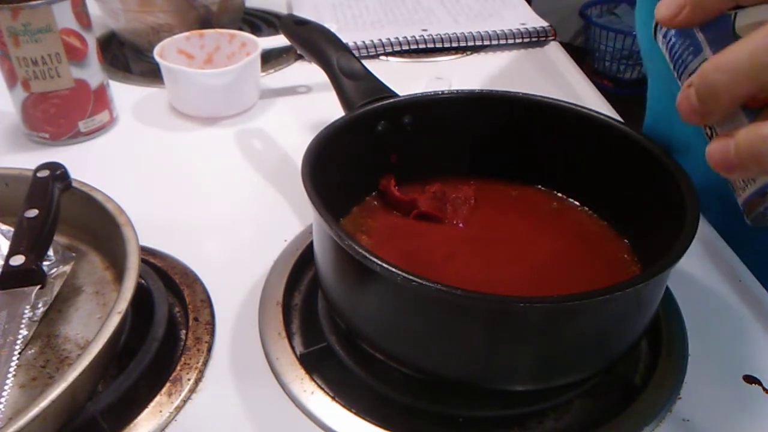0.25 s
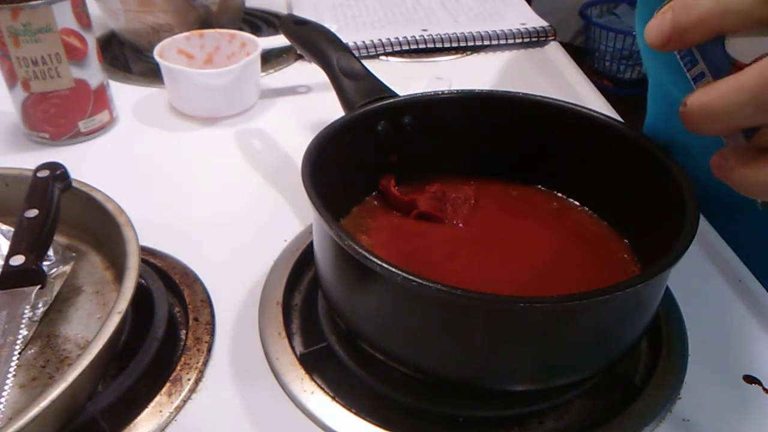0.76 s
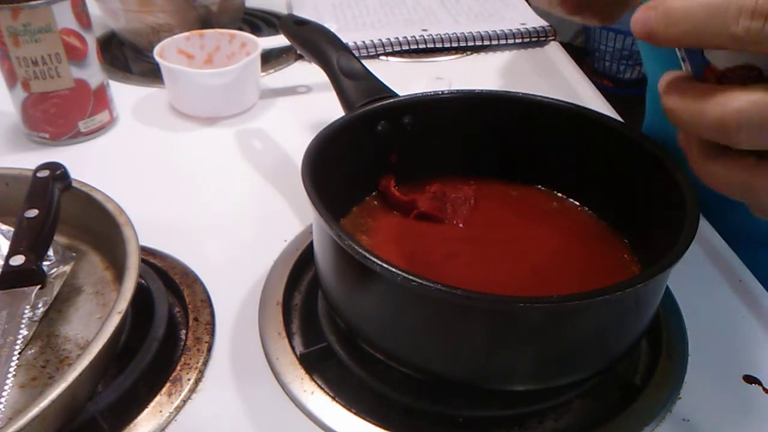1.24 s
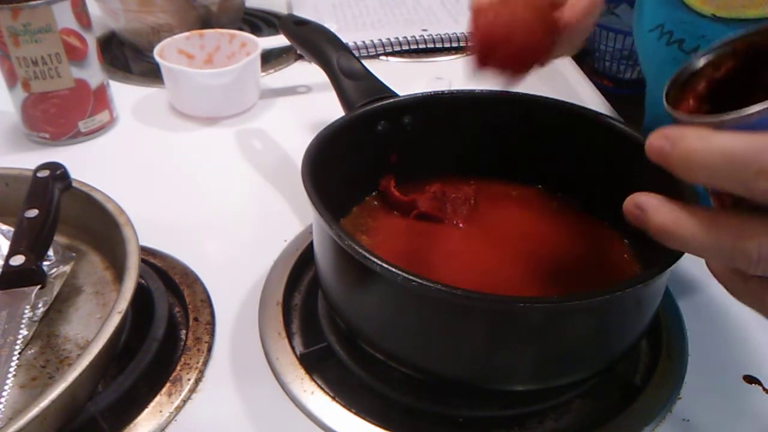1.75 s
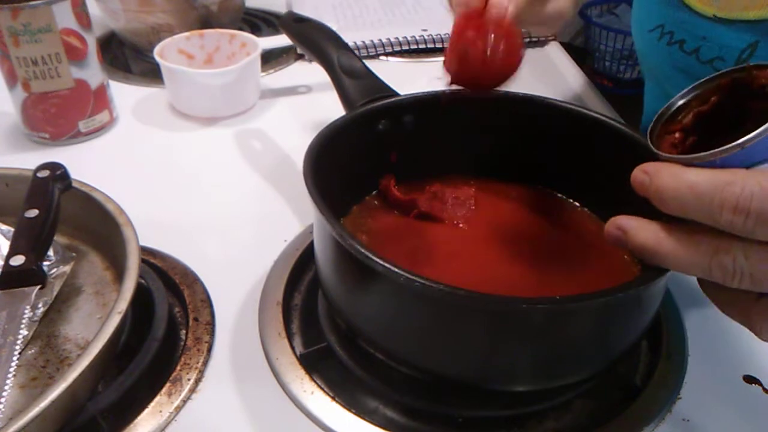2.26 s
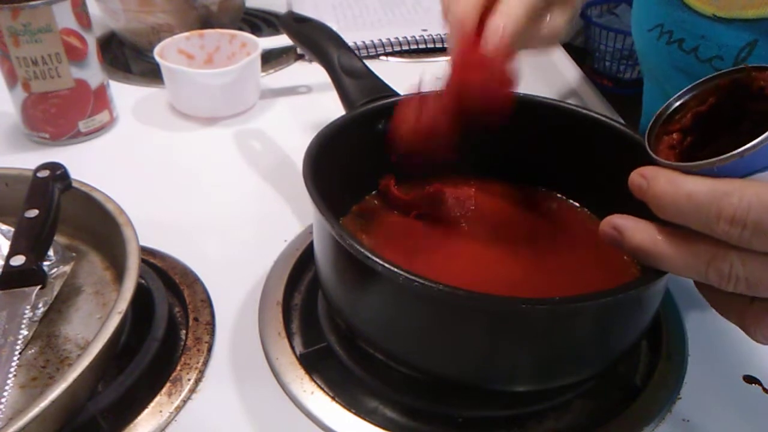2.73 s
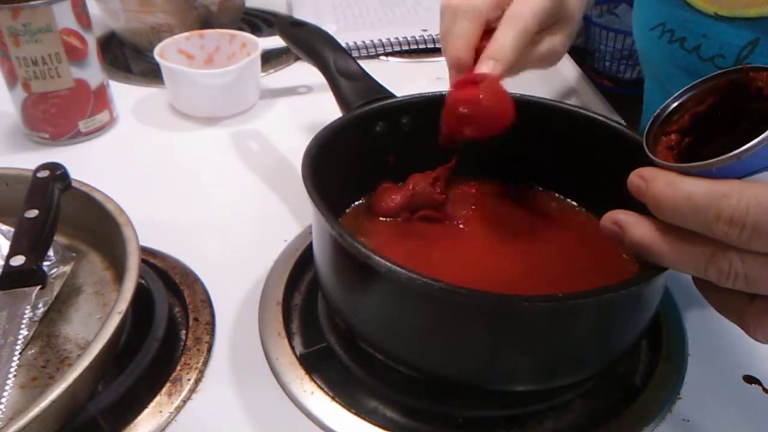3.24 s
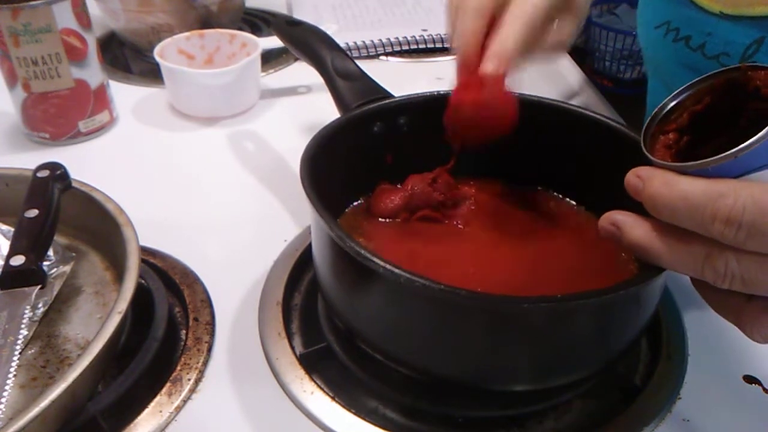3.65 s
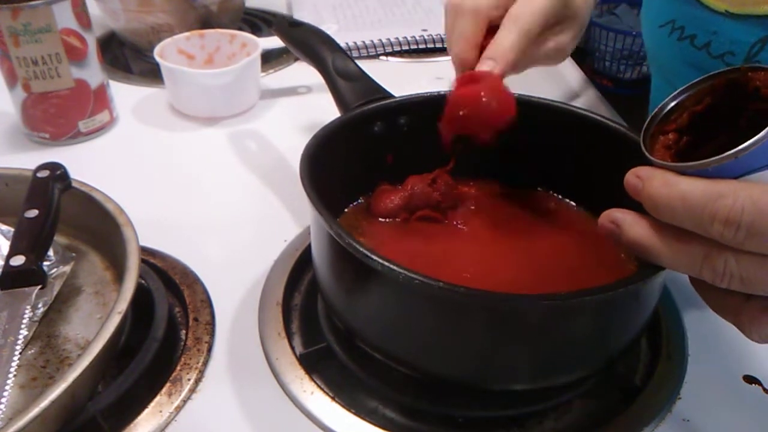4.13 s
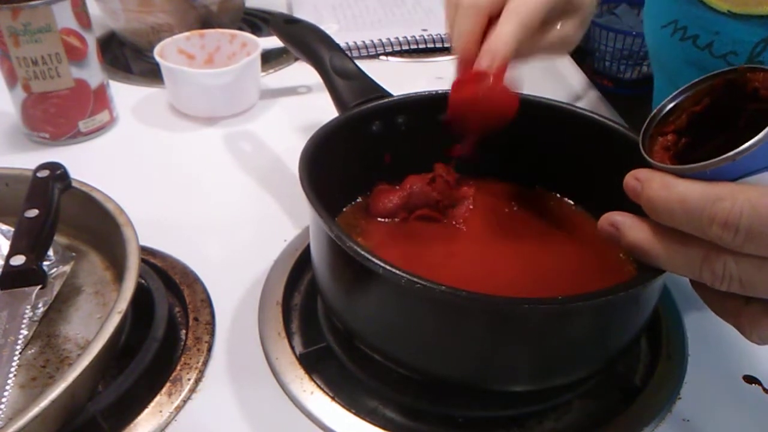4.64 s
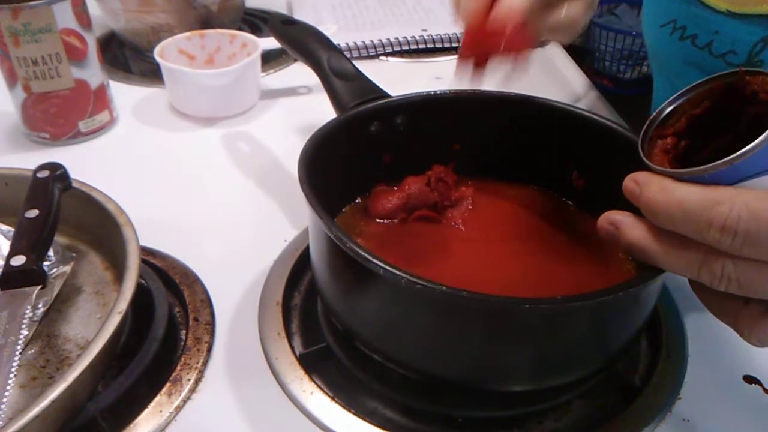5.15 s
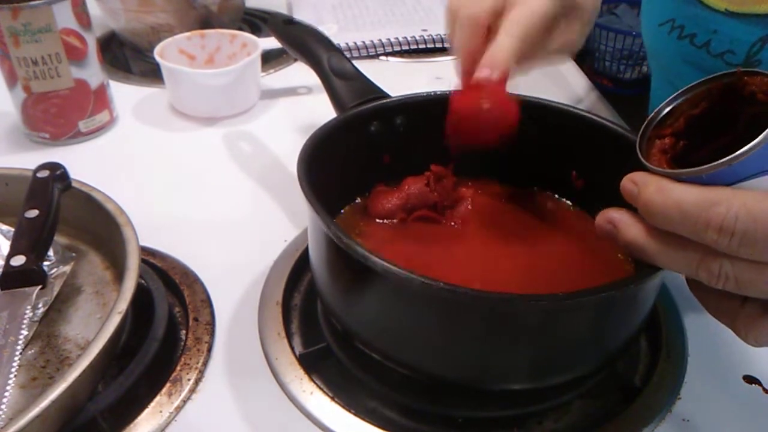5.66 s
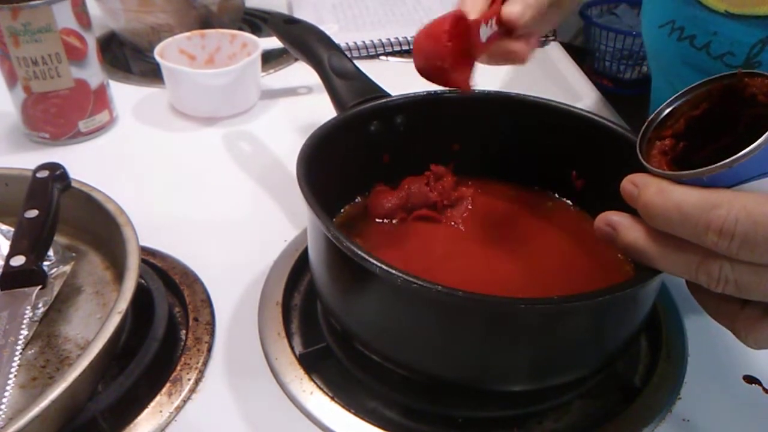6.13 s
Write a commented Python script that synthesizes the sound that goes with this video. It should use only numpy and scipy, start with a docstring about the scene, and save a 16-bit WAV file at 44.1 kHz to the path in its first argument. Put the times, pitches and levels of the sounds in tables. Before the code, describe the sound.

Soft handling bumps and faint scrapes in a can come first, with a tiny clink. From just after two seconds, eighteen regular hard flicks of metal measuring spoons follow, snappy and piercing, each trailed by brief jangling chatter. They grow somewhat harder toward the end. Quick kitchen reflections and a short tail surround them; the close microphone slightly overloads on the loudest clacks.

```python
"""Small kitchen: a measuring spoon is flicked hard eighteen times over a saucepan to shake off tomato paste.
Each flick stops in a noise crack with a bright sine ping, and a hollow two-sine pop from the bowl.
Loose spoons on the ring then rattle and knock back: random contacts filtered by ringing modes.
Noise gives the flutter, air puffs, rubs and dull bumps; before the flicks come a light tick and a very faint one.
Quick echoes and a short tail surround it, over a quiet floor; the close stereo microphone overloads softly."""
import sys
import numpy as np
from scipy import signal
from scipy.fft import rfft, irfft
from scipy.io import wavfile
from scipy.ndimage import uniform_filter1d

SR = 44100
rng = np.random.default_rng(int(sys.argv[2]) if len(sys.argv) > 2 else 0)


def dump_mix(stems):
    """Bounce the given channels to the path in sys.argv[1] as a 16-bit WAV at rate SR."""
    frames = np.atleast_2d(stems).T  # one column per channel
    limited = np.clip(frames, -1, 1)  # hard clip at full scale
    pcm = np.round(limited * 32767).astype(np.int16)
    wavfile.write(sys.argv[1], SR, pcm)


N = 281799

# Levels in tables are relative.
# flicks: stop t/s, crack level/dB, ping f/Hz, ping level/dB, bowl f/Hz, rattle level/dB,
# rebound level/dB, time to settle/s, settling knock level/dB, flutter level/dB
FLICKS = [(2.1313, -8, 6860, -37, 670, -22, -10.5, 0.094, -17, -37.5),
          (2.3833, -12.5, 4800, -15, 640, -21.5, -13, 0.066, -12, -36),
          (2.5961, -10.5, 7040, -12.5, 630, -20, -16, 0.093, -38, -38),
          (2.8231, -9, 6550, -15.5, 623, -20.5, -15, 0.092, -15, -38.5),
          (3.043, -10, 6730, -10.5, 626, -21.5, -19.5, 0.057, -13, -46.5),
          (3.271, -9.5, 6890, -10, 698, -19.5, -15, 0.08, -23.5, -41),
          (3.5017, -8.5, 7370, -4, 726, -19, -20.5, 0.056, -9.5, -43.5),
          (3.7315, -11, 7440, -4, 696, -25, -19.5, .056, -27, -58),
          (3.9609, -7.5, 7030, -5.5, 713, -22, -17.5, 0.089, -16, -43.5),
          (4.178, -7.5, 7370, -7.5, 754, -21, -26, 0.083, -30, -40),
          (4.4053, -4.5, 7580, -15, 749, -21, -17.5, 0.08, -24, -41),
          (4.6267, -5.5, 7460, -11.5, 722, -14, -13, 0.049, -33, -39.5),
          (4.867, -6, 6910, -2, 724, -17.5, -8.5, .084, -26, -41.5),
          (5.0825, -3, 7330, -13, 675, -19, -9.5, 0.055, -35, -41),
          (5.3044, -5, 7510, -9, 625, -18.5, -13, .058, -14.5, -40.5),
          (5.5178, -4, 7630, -11.5, 661, -18, -8.5, 0.057, -12, -36.5),
          (5.731, -4.5, 7564, -6.5, 617, -17, -10.5, 0.054, -17, -37.5),
          (5.9513, -7, 6900, -11, 622, -16.5, -11.5, 0.056, -30, -38)]
# loose spoons swinging back after a stop: delay/s, level re rebound/dB
BOUNCES = [(.040, 0), (.060, -7)]


def amp(db):
    """Decibels to gain."""
    return 10 ** (np.asarray(db) / 20)


def read(points, hz):
    """Interpolates (f/Hz, value) on a log-frequency axis."""
    f, value = np.transpose(points)
    return np.interp(np.log(hz + 1), np.log(f + 1), value)


def evened(x):
    """Scales to rms 1."""
    return x / np.sqrt(np.mean(x ** 2) + 1e-20)


def ring_down(t_s, t60_s):
    """Exponential decay, 60 dB in t60_s."""
    return np.exp(-np.log(1000) * t_s / t60_s)


def add(mix, start_s, sound):
    """Mixes a sound in at start_s, cut at the end of the mix."""
    start = max(round(start_s * SR), 0)
    part = mix[..., start:][..., :sound.shape[-1]]
    part += sound[..., :part.shape[-1]]


def convolve(x, response):
    """Passes one or two channels through a response."""
    return signal.fftconvolve(np.atleast_2d(x), np.atleast_2d(response), axes=1)[:, :N]


def colour(x, spectrum, size=4096):
    """Minimum-phase filter of energy 1 with the given spectrum shape."""
    hz = abs(np.fft.fftfreq(size, 1 / SR))
    log_gain = np.log(amp(read(spectrum, hz)))
    response = np.exp(np.conj(signal.hilbert(log_gain)))
    taps = np.fft.ifft(response).real[:size // 2]
    return convolve(x, taps / np.linalg.norm(taps))


def pan(left_db):
    """Channel gains for a left-minus-right level."""
    return amp([[left_db / 2], [-left_db / 2]])


def bursts(rows, first_db=11, size=4096):
    """Contacts strike once, chatter and die away: rows of t/s, level/dB, e-fold decay/s."""
    out, t = np.zeros(N), np.arange(size) / SR
    for s, db, decay_s in rows:
        chatter = np.exp(-t / decay_s) * rng.choice([-1., 1.], size)
        chatter[0] = amp(first_db)
        add(out, s, amp(db) * chatter)
    return out


def swells(rows, spectrum, size=1400):
    """Half-sine swells of evened coloured noise: rows of middle t/s, length/s, level/dB."""
    level = np.zeros(N)
    for s, length_s, db in rows:
        arch = np.sin(np.pi * np.arange(0, 1, 1 / (length_s * SR)))
        add(level, s - length_s / 2, amp(db) * arch)
    noise = colour(rng.standard_normal(N), spectrum)[0]
    local_power = abs(uniform_filter1d(noise ** 2, size))
    return level * noise / np.sqrt(local_power + 1e-9)


def ports(make, apart):
    """Contacts reach each microphone port by partly different paths: a shared and an own part."""
    return np.sqrt(1 - apart) * make() + np.sqrt(apart) * np.array([make(), make()])


def paired(a, b):
    """Two unrelated noises become a left and right that agree most in the bass and low mids."""
    # left-right likeness: f/Hz, correlation
    likeness = [(50, 0.86), (250, 0.86), (600, 1), (1500, 0.28), (4000, 0.021), (14000, 0.085)]
    same = np.clip(read(likeness, np.fft.rfftfreq(len(a), 1 / SR)), -1, 1)
    right = irfft(same * rfft(a) + np.sqrt(1 - same ** 2) * rfft(b), len(a))
    return np.array([a, right])


def flick_starts():
    """Sample indices 10 ms ahead of each stop."""
    return [round((row[0] - .01) * SR) for row in FLICKS]


def clacks(partials=(.9, .955, 1, 1.045, 1.1), detune=.012, ping_t60_s=0.032, crack_decay_s=0.0069):
    """The spoon is stopped dead: a broadband crack and a short ping of close partials."""
    # crack spectrum: f/Hz, level per Hz/dB
    crack_spectrum = [(100, -30.5), (400, -9), (1000, -4), (2000, -11), (4500, -7), (6000, -3.5),
                      (7300, 11), (8500, -4), (10000, -0.5), (12000, -12), (14500, -13)]
    t, pings = np.arange(SR // 10) / SR, np.zeros((2, N))
    for s, _, ping_hz, ping_db, *_ in FLICKS:
        spread = 1 + detune * rng.standard_normal((len(partials), 1))
        hz = ping_hz * np.array(partials)[:, None] * spread
        phase = rng.random((2, len(partials), 1))
        ping = np.sin(2 * np.pi * (hz * t + phase)).sum(1)
        add(pings, s, amp(ping_db) * ring_down(t, ping_t60_s) * ping)
    rows = [(s, db, crack_decay_s) for s, db, *_ in FLICKS]
    cracks = colour(ports(lambda: bursts(rows), apart=0.65), crack_spectrum)
    return amp(-2) * (spoons(cracks, ring_db=-9, left_db=-12) + pan(-4) * pings)


def spoons(x, ring_db, left_db, detune=.01, size=3000):
    """Contacts ring the spoons; they hang differently after each flick, so the modes shift a little."""
    # modes of the bunch: f/Hz, level/dB, t60/s
    modes = [(1495, -17, 0.016), (1964, -20, 0.1), (3476, -23, 0.065), (5470, -16.5, 0.054),
             (5990, -16.5, 0.026), (6715, -20, 0.033), (6940, -14, .03), (7230, -21.5, 0.061),
             (7562, -8.5, 0.009), (7880, -10, 0.014), (8250, -11, 0.012), (9150, -15, 0.024),
             (8610, -17, 0.015), (9650, -32.5, .03)]
    t, out = np.arange(size) / SR, np.zeros((2, N))
    hz, db, t60_s = np.transpose(modes)[:, :, None]
    edges = flick_starts() + [N]
    for a, b in zip(edges, edges[1:]):
        shifted_hz = hz * (1 + detune * rng.standard_normal(hz.shape))
        phase = rng.random((2, len(hz), 1))
        rings = ring_down(t, t60_s) * np.sin(2 * np.pi * (shifted_hz * t + phase))
        rings = rings / np.linalg.norm(rings, axis=2, keepdims=True)
        add(out, a / SR, convolve(x[:, a:b], (amp(db) * rings).sum(1)))
    return x + amp(ring_db) * pan(left_db) * out


def rattle(per_s=1400, spread_db=4, rise_s=0.013, fade_s=0.016, sag_db=-3, linger_s=.003,
           knock_decay_s=0.0082, hollow_db=-18, hollow_follow=0.35):
    """Loose spoons chatter on their ring after each stop: random touches, hard landings, hollow knocks."""
    # spectra: f/Hz, level per Hz/dB
    clatter_spectrum = [(100, -25.5), (350, -11), (600, -8), (1050, -7), (1400, -2.5), (2400, -5.5),
                        (3100, -5.5), (5000, -6), (6500, -1), (7800, -2.5), (9000, -1), (10000, -5.5),
                        (12000, -9.5), (14000, -19.5)]
    knock_spectrum = [(300, -43), (1050, -23), (1450, 9), (1800, -11), (2600, 3), (4000, -34.5),
                      (8000, -50.5)]
    # further touches between flicks: t/s, level/dB, decay/s
    late_clinks = [(2.261, -24, 0.008), (5.871, -38.5, 0.0074)]
    age, level, hollow = np.arange(SR // 4) / SR, np.zeros(N), []
    for s, *_, rattle_db, rebound_db, settle_s, _, _ in FLICKS:
        held = amp(rattle_db + sag_db * np.minimum(age / settle_s, 1)) * np.minimum(age / rise_s, 1)
        add(level, s, held * np.exp(-np.maximum(age - settle_s - linger_s, 0) / fade_s))
        knock_db = hollow_db + hollow_follow * rebound_db
        hollow += [(s + delay_s, knock_db + db, knock_decay_s) for delay_s, db in BOUNCES]
    # sparse touches: times and sizes common to both ports, signs partly their own
    sizes = (rng.random(N) < per_s / SR) * amp(spread_db * np.minimum(rng.exponential(1, N), 3))
    touches = evened(ports(lambda: sizes * rng.choice([-1, 1], N), apart=0.75)) * clumps(depth_db=0.5)
    landings = ports(lambda: bursts(rebounds(knock_decay_s) + late_clinks), apart=0.77)
    contacts = colour(level * touches + amp(0.5) * landings, clatter_spectrum)
    contacts = contacts + colour(bursts(hollow), knock_spectrum)
    return pan(-1) * spoons(contacts, ring_db=-2, left_db=-4.5)


def clumps(depth_db, size=130):
    """Uneven pressure that weights contacts into clumps a few milliseconds long."""
    slow = uniform_filter1d(uniform_filter1d(rng.standard_normal(N), size), size)
    return evened(amp(depth_db * np.clip(evened(slow), -2, 2)))


def rebounds(decay_s):
    """Loose spoons bounce until a last knock settles them: rows of t/s, level/dB, decay/s."""
    rows = []
    for s, *_, rebound_db, settle_s, settle_db, _ in FLICKS:
        for delay_s, db in BOUNCES:
            if delay_s + decay_s < settle_s:
                rows.append((s + delay_s, rebound_db + db, decay_s))
        rows.append((s + settle_s, settle_db, decay_s))
    return rows


def bowl(t60_s=0.051, rise_s=.002, upper_ratio=1.13, upper_db=-8):
    """The air in the spoon's bowl pops at every stop: two decaying modes."""
    # pop level as paste leaves the bowl: t/s, level/dB
    pop_levels = [(2.13, -35.5), (2.45, -43), (3.27, -35), (3.5, -28), (3.75, -32), (4.2, -21.5),
                  (4.65, -20.5), (5.95, -27.5)]
    t, pops = np.arange(SR // 10) / SR, np.zeros(N)
    for s, _, _, _, hz, *_ in FLICKS:
        pop = np.sin(2 * np.pi * hz * t) + amp(upper_db) * np.sin(2 * np.pi * hz * upper_ratio * t)
        pop_gain = amp(np.interp(s, *np.transpose(pop_levels)))
        add(pops, s, pop_gain * np.minimum(t / rise_s, 1) * ring_down(t, t60_s) * pop)
    return amp(6.5) * pan(4.3) * pops


def shaking(lag_s=0.051, length_s=.116, hum_hz=(230, 420), hum_age_s=(.04, .1), width_hz=55, hum_db=-3):
    """Dull low flutter of the spoons in the hand; its narrow-band hollow tone climbs after each stop."""
    # flutter spectrum: f/Hz, level per Hz/dB
    body_spectrum = [(30, -13), (70, -4), (130, -1), (190, -10.5), (260, -3.5), (380, 5), (520, -7.5),
                     (900, -23), (3000, -50)]
    age, hum = np.arange(0, length_s, 1 / SR), np.zeros(N)
    carrier = np.exp(2j * np.pi * np.cumsum(np.interp(age, hum_age_s, hum_hz)) / SR)
    for s, *_, db in FLICKS:
        noise = np.array([1, 1j]) @ rng.standard_normal((2, SR // 4))
        slow = signal.lfilter(*signal.butter(2, width_hz, fs=SR), noise)[-len(age):]
        arch = np.sin(np.pi * age / length_s) ** .5
        add(hum, s, amp(db + hum_db) * evened((slow * carrier).real) * arch)
    flutter = swells([(s + lag_s, length_s, db) for s, *_, db in FLICKS], body_spectrum)
    return pan(1.1) * (amp(1.5) * flutter + hum)


def scooping(squelch_s=1.07, squelch_length_s=0.053, squelch_db=-70):
    """Soft rubs in the paste that ring the can, one faint squelch and light touches of the spoon."""
    # rubs: start t/s, length/s, level/dB
    rub_rows = [(0.255, 0.053, -66), (0.623, 0.063, -72), (1.554, 0.054, -64.5), (1.692, 0.079, -60.5)]
    # light touches: t/s, level/dB, decay/s
    tick_rows = [(1.3175, -29.5, 0.0095), (1.985, -61, .012)]
    # spectra: f/Hz, level per Hz/dB
    rub_spectrum = [(500, -15.5), (1300, -13), (1900, -3.5), (2900, -10.5), (4100, -7.5), (6500, -27.5),
                    (12000, -34)]
    tick_spectrum = [(200, -23), (900, -10.5), (1700, -10), (2500, -16), (3700, -12.5), (4650, 5.5),
                     (5300, -2), (7500, 10), (9500, 2.5), (10500, -1.5), (14000, -11)]
    # can modes: f/Hz, level/dB, t60/s
    can_modes = [(1710, -9, .3), (2070, -6.5, .25)]
    rubs = swells([(s + length_s / 2, length_s, db) for s, length_s, db in rub_rows], rub_spectrum)
    t = np.arange(SR // 3) / SR
    response = np.zeros(len(t))
    for hz, db, t60_s in can_modes:
        ring = ring_down(t, t60_s) * np.sin(2 * np.pi * hz * t)
        response += amp(db) * ring / np.linalg.norm(ring)
    can = convolve(rubs, response)
    squelch_spectrum = [(900, -37), (1300, 0), (1700, -37), (5000, -60)]
    squelch = swells([(squelch_s, squelch_length_s, squelch_db)], squelch_spectrum)
    ticks = colour(ports(lambda: bursts(tick_rows), apart=1.0), tick_spectrum)
    return amp(-1.0) * rubs + amp(-10) * can + squelch + ticks


def thuds(puff_lag_s=.035, puff_length_s=.06, puff_db=-1.5):
    """Dull bumps of hands and dropping paste, and air pushed at the microphone by each flick."""
    # bumps: peak t/s, length/s, level/dB
    bumps = [(.655, 0.17, -51), (1.04, 0.23, -54), (1.24, 0.14, -56.5), (1.68, 0.11, -49),
             (1.84, 0.17, -49.5), (2.735, 0.025, -44), (2.972, 0.051, -39), (4.648, .044, -33)]
    # spectrum: f/Hz, level per Hz/dB
    thud_spectrum = [(20, -44.5), (32, -25), (45, -4.5), (62, 7.5), (95, -9.5), (160, -26), (400, -40),
                     (2000, -67.5)]
    # puff_db is relative to the flutter column
    puffs = [(s + puff_lag_s, puff_length_s, db + puff_db) for s, *_, db in FLICKS]
    return swells(bumps + puffs, thud_spectrum)


def stove(x, wander_s=.0003):
    """Direct sound plus quick reflections, whose paths differ at each port and change with each flick."""
    # echoes off hand, stove top and wall: delay/s, level/dB
    echoes = [(.0009, -10), (.0033, -5), (.0075, -15.5)]
    out = x.copy()
    edges = [0] + flick_starts() + [N]
    for a, b in zip(edges, edges[1:]):
        for delay_s, db in echoes:
            for port, shift_s in enumerate(wander_s * rng.standard_normal(2)):
                add(out[port], a / SR + delay_s + shift_s, amp(db) * x[port, a:b])
    return out


def kitchen(x, tail_db=-8, build_s=0.0083, size=14336, count=3, taps_per_s=3000):
    """Short room tail of sparse decaying taps; three different tails fade into one another at a steady rate."""
    # decay: f/Hz, t60/s
    room_t60 = [(100, 0.46), (350, 0.15), (700, 0.17), (1500, 0.14), (2700, 0.22), (4200, 0.17),
                (5500, 0.23), (7500, 0.2), (13000, 0.13)]
    out, t = np.zeros((2, N)), np.arange(N) / SR
    for k in range(count):
        taps = rng.choice([-1., 1.], (2, size)) * (rng.random((2, size)) < taps_per_s / SR)
        hz, at_s, z = signal.stft(paired(*taps), SR, nperseg=256)
        decayed = z * ring_down(at_s, read(room_t60, hz)[:, None])
        tail = signal.istft(decayed, SR, nperseg=256)[1][:, :size]
        tail = tail * np.minimum(np.arange(size) / SR / build_s, 1)
        share = np.sqrt(2 / count) * np.cos(np.pi * (11 * t + k / count))
        out += convolve(x * share, tail / np.linalg.norm(tail[0]))
    return amp(tail_db) * out


def floor():
    """Quiet steady background: coloured stereo noise."""
    # spectrum: f/Hz, level per Hz/dB
    floor_spectrum = [(20, -33), (55, 5), (110, -8), (200, -11), (400, -17.5), (1000, -22.5), (2000, -28.5),
                      (4500, -35), (6000, -35.5), (7800, -29), (10000, -40), (14000, -42)]
    return amp(-60.5) * colour(paired(*rng.standard_normal((2, N))), floor_spectrum)


def scene():
    """Spoons and hands in the kitchen, over a quiet floor."""
    spoon = amp(-2.5) * pan(-0.44) * (clacks() + rattle() + scooping())
    air = shaking() + bowl()
    return stove(spoon) + air + kitchen(spoon + air) + thuds() + floor()


def record(dry, ceiling=0.76, low_cut_hz=34, edge_hz=14600):
    """The microphone loses the lowest bass and overloads on the hardest clacks; then the band limit."""
    thinned = signal.lfilter(*signal.butter(2, low_cut_hz, "highpass", fs=SR), dry)
    squashed = thinned / (1 + (thinned / ceiling) ** 4) ** (1 / 4)
    low_pass = signal.firwin(161, edge_hz, window=("kaiser", 8), fs=SR)
    return signal.oaconvolve(squashed, low_pass[None], "same")


dry = scene()
out = record(dry)
dump_mix(out)
```